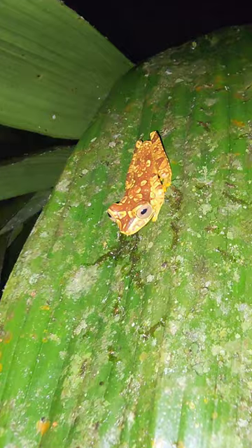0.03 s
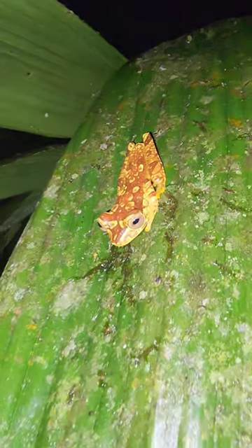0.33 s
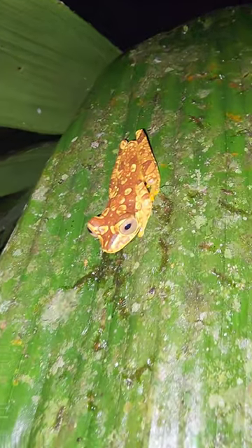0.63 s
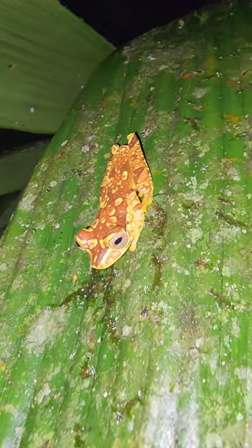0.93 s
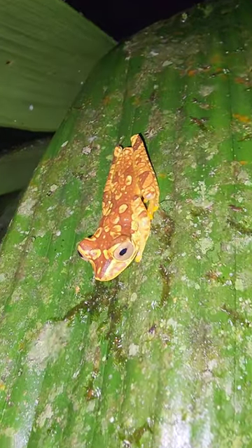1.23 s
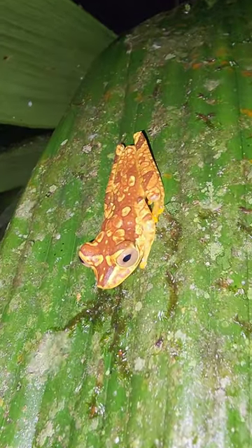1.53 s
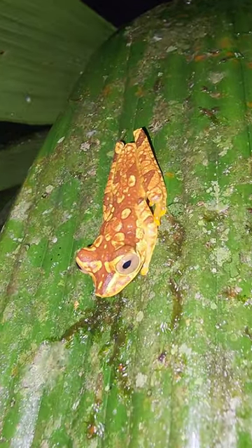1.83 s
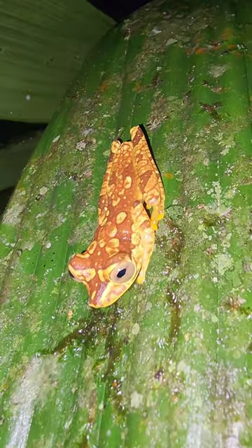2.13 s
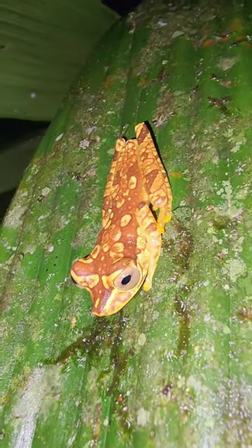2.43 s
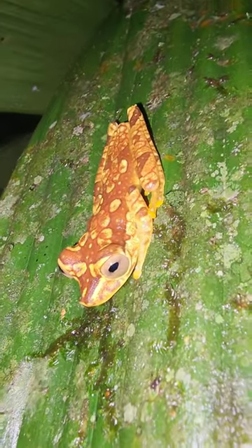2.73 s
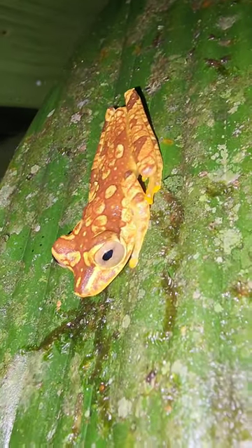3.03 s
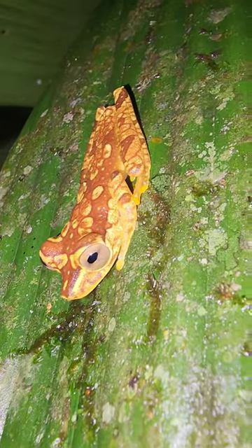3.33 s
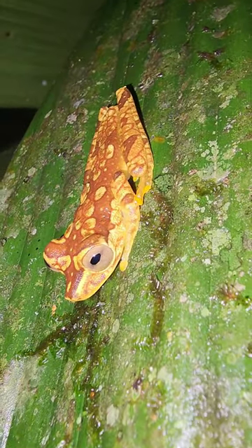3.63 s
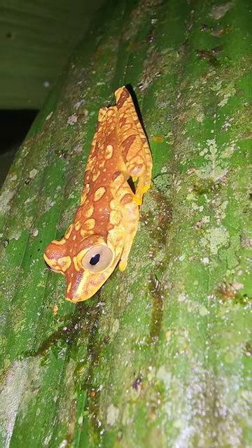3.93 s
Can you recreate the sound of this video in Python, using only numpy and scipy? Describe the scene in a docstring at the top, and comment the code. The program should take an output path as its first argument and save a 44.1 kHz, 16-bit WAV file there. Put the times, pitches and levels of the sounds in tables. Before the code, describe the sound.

Crickets trill and chirp in a dense, high chorus in a rain forest at night.

```python
"""Crickets trilling far and near in a rain forest at night, heard from a stereo microphone among the trees.
Each wing stroke is a short tone, smeared by echoes off trunks and leaves. The closest callers chirp on
the right, far whistles rise out of the chorus, and a katydid buzzes very high.
Water drips from the leaves over a soft wash of air, with a few dull bumps close to the microphone."""
import sys
import numpy as np
from scipy import signal
from scipy.fft import rfft, irfft
from scipy.io import wavfile
from scipy.ndimage import uniform_filter1d

SR = 44100
rng = np.random.default_rng(int(sys.argv[2]) if len(sys.argv) > 2 else 0)


def int16_out(signal):
    """Quantize to a 16-bit WAV file."""
    q = np.round(np.clip(np.atleast_2d(signal).T, -1, 1) * 32767)
    wavfile.write(sys.argv[1], SR, q.astype(np.int16))


N = 176400

# air all round the microphone: (frequency [Hz], relative spectral level [dB])
AIR_SPECTRUM = [(20, -38), (36, -8.5), (55, 4.5), (72, 11), (105, -9), (180, -13), (330, -4), (700, 0.5),
                (1100, -1.5), (2150, 2), (2600, -7), (3800, -4), (4230, -4), (8000, -9), (9800, -11.5),
                (11600, -9.5), (13200, -14.5), (15800, -24.5)]
# lean of the air: (frequency [Hz], left over right [dB])
AIR_BALANCE = [(60, -2), (400, 3.5), (1200, -3.0), (2700, -1.0), (9000, 0.8)]
# likeness of diffuse sound in the two channels: (frequency [Hz], correlation [-1..1])
COHERENCE = [(60, 0.82), (280, 0.98), (550, 0.45), (1000, -0.035), (2000, -0.023), (12000, 0.018)]
# close bumps: (time [s], pitch [Hz], relative level [dB])
CLOSE_BUMPS = [(0.462, 288, -64.5), (1.15, 280, -60), (1.841, 264, -60), (1.89, 324, -53.5),
               (3.235, 238, -57.5), (3.322, 346, -62), (3.35, 248, -58), (3.391, 302, -57),
               (3.456, 247, -56)]
# drops on nearby leaves: (time [s], level [dB], centre [Hz])
LEAF_DRIPS = [(.125, -49.5, 790), (.372, -43.5, 970), (.809, -45.5, 900), (.84, -47, 690),
              (1.149, -47.5, 700), (1.19, -51.5, 700), (1.566, -50, 1000), (1.675, -49, 695),
              (1.867, -45.5, 1270), (2.485, -45.5, 1480), (2.613, -46.5, 790), (2.747, -48.5, 600),
              (3.008, -53, 900), (3.243, -49, 646), (3.455, -48, 1490), (3.596, -46, 890),
              (3.907, -49, 700)]
# one crisp tick: (time [s], level [dB], 60 dB decay [s])
CRISP_TICK = (3.398, -50, 0.26)
# stray calls further off: (time [s], length [s], pitch [Hz], level [dB])
STRAY_CALLS = [(2.02, .05, 2975, -65), (2.125, .06, 2975, -62.5), (2.74, .1, 3560, -61.5),
               (3.38, .06, 3780, -65), (3.52, .04, 3560, -62)]
# one high rasp: (time [s], length [s], level [dB])
STRAY_RASP = [(2.03, 0.11, -51)]
# katydid: (time [s], length [s], pitch [Hz], relative level [dB])
KATYDID_BUZZES = [(.22, .27, 14360, -63.5), (2.065, .27, 13830, -55.5)]
# far whistles: (time [s], length [s], final pitch [Hz], relative level [dB])
RISING_WHISTLES = [(.765, .105, 5325, -48.5), (.87, .095, 5305, -50.5), (1.875, .125, 5140, -52),
                   (2.865, .135, 5333, -44)]
# low two-note calls: (time [s], level [dB])
LOW_CALLS = [(.175, -54.5), (.925, -52), (1.635, -50.5), (2.312, -53), (3.175, -56), (3.848, -54.5)]
# far cricket chorus: (frequency [Hz], relative spectral level [dB])
CHORUS_SPECTRUM = [(3000, -46), (3450, -44), (3800, -14.5), (4080, -22), (4230, -34), (4500, -19),
                   (4800, -9), (5400, -7), (5600, -5.5), (6250, -4), (6600, -6.5), (6850, -4.5), (7270, -6),
                   (7420, -13), (7750, -34), (8200, -36)]
# lean of the chorus: (frequency [Hz], left over right [dB])
CHORUS_BALANCE = [(3800, -4), (5000, -2), (5800, -4), (6500, -7), (7200, -10.5), (8000, 2)]
# distant trills: (pitch [Hz], pitch spread [Hz], level [dB], strokes [1/s], left over right [dB])
STEADY_TRILLS = [(3644, 6, -70, 15, 4), (3833, 12, -75, 31, 5), (4027, 5, -76, 40, 4),
                 (4380, 26, -68, 31, -1), (4648, 22, -61.5, 29, 0), (4904, 25, -63, 41, 0),
                 (5138, 35, -66, 38, 0), (5315, 40, -65, 45, -1), (5710, 45, -67, 49, -2),
                 (5990, 65, -61.5, 52, -4), (6400, 130, -56, 40, -7), (6637, 10, -60, 25, -5),
                 (7072, 15, -58.5, 24, -6), (7195, 50, -56, 40, -7)]
# near cricket, well to the right: (time [s], length [s], level [dB])
NEAR_CRICKET = [(.295, .05, -38), (.394, 0.021, -33), (.435, 0.013, -38), (.467, 0.024, -33),
                (.514, 0.02, -38), (1.065, 0.053, -40.5), (1.135, 0.022, -40.5), (1.50, 0.058, -44.5),
                (1.56, 0.048, -43), (1.905, 0.056, -45), (1.955, .07, -42), (2.575, 0.054, -42),
                (2.64, 0.057, -40.5)]
# loud rasping cricket, right: (time [s], length [s], level [dB])
RASPING_CRICKET = [(.09, .15, -43), (.25, 0.12, -44.5), (1.90, 0.11, -47), (2.04, 0.23, -47),
                   (3.652, 0.075, -33), (3.785, 0.023, -31.5), (3.821, 0.038, -32.5)]
# thin-voiced cricket, well to the right: (time [s], length [s], level [dB])
THIN_CRICKET = [(1.04, 0.025, -49), (1.62, .06, -53), (2.46, 0.062, -54), (2.85, 0.21, -55.5),
                (3.08, 0.122, -49.5), (3.215, 0.038, -44), (3.27, .05, -45.5), (3.375, .11, -47.5),
                (3.54, 0.043, -47.5)]
# evenly paced cricket, right of centre: (time [s], length [s], level [dB])
EVEN_CRICKET = [(.16, 0.039, -43.5), (.565, .06, -45), (.96, 0.054, -49), (1.345, 0.052, -49),
                (1.70, .06, -53.5), (2.26, 0.054, -50), (2.68, 0.037, -54), (3.09, 0.045, -49.5),
                (3.39, 0.047, -47), (3.63, 0.031, -45), (3.79, .06, -49)]
# far rasping cricket, just left of centre: (time [s], length [s], level [dB])
FAR_CRICKET = [(.345, .17, -52), (.78, .16, -55), (1.49, 0.14, -55), (1.885, 0.13, -54),
               (2.93, 0.124, -50.5), (3.62, 0.2, -55)]


def amp(db):
    """Decibels to gain."""
    return 10 ** (np.asarray(db) / 20)


def unit(x):
    """Scales to rms 1."""
    return x / np.sqrt(np.mean(x ** 2) + 1e-20)


def read(points, hz):
    """Reads a table on a log-frequency axis."""
    f, value = np.transpose(points)
    return np.interp(np.log(hz + 1), np.log(f), value)


def add(mix, s, sound):
    """Mixes a sound in at s seconds."""
    part = mix[..., max(0, round(s * SR)):][..., :sound.shape[-1]]
    part += sound[..., :part.shape[-1]]


def drift(n, rate_hz):
    """Smooth random wander of rms about 1."""
    f = np.fft.rfftfreq(32768, 10 / SR)
    slow = unit(irfft(rfft(rng.standard_normal(32768)) * np.exp(-(f / rate_hz) ** 2)))
    return np.interp(np.arange(n) / 10, np.arange(len(slow)), slow)


def puff(hz, octaves, t60):
    """A dying burst of noise round one pitch, in two channels."""
    t, f = np.arange(SR // 4) / SR, np.fft.rfftfreq(SR // 4, 1 / SR) + 1
    band = np.exp(-.5 * (np.log2(f / hz) / octaves) ** 2)
    noise = irfft(rfft(rng.standard_normal((2, len(t)))) * band, len(t))
    return unit(noise) * np.minimum(t / 0.0016, 1) * amp(-60 * t / t60)


def forest(x, wet, side_db, t60=0.62):
    """Direct sound plus scattered echoes from trunks and leaves; positive side_db is to the left."""
    t = np.arange(SR * 3 // 4) / SR
    taps = rng.standard_normal((2, len(t))) * (rng.random((2, len(t))) < .08) * amp(-60 * t / t60)
    taps *= np.sqrt(wet) / np.linalg.norm(taps, axis=1, keepdims=True)
    taps[[0, 1], rng.integers(0, 8, size=2)] += np.sqrt(1 - wet)  # direct path
    out = signal.oaconvolve(x[None], taps, axes=1)[:, :N]
    pan = unit(amp(np.array([[side_db], [-side_db]]) / 2))
    return out * x.std() / (out.std(axis=1, keepdims=True) + 1e-12) * pan


def wash(spectrum, balance, flicker_db, patch_db):
    """Diffuse noise from all sides, whose level flickers and drifts in patches."""
    frames, hz = N // 256 + 5, np.fft.rfftfreq(1024, 1 / SR)
    a, b, c, d, patches = rng.standard_normal((frames, len(hz), 5)).T
    patches = unit(uniform_filter1d(uniform_filter1d(patches, size=14, axis=0), size=16, axis=1))
    flicker = unit(uniform_filter1d(rng.standard_normal(frames), size=3))
    likeness, lean = read(COHERENCE, hz)[:, None], amp(read(balance, hz) / 2)[:, None]
    left = a + 1j * b
    right = likeness * left + np.sqrt(1 - likeness ** 2) * (c + 1j * d)
    bins = np.array([left * lean, right / lean])
    bins *= amp(read(spectrum, hz)[:, None] + patch_db * patches + flicker_db * flicker)
    return unit(signal.istft(bins, nperseg=1024, noverlap=768)[1][:, :N])


def strokes(n, hz, spread_hz, per_s, duty=.7, jitter=.12):
    """Wing strokes: each is a short tone that sags in pitch and fills the duty share of its cycle."""
    cycle = np.cumsum(per_s * (1 + jitter * drift(n, 8.3))) / SR % 1
    progress = np.minimum(cycle / duty, 1)
    pitch = hz + spread_hz * (2 * (.5 - progress) + 0.765 * drift(n, 232))
    return unit(np.sin(np.pi * progress) * np.sin(2 * np.pi * np.cumsum(pitch) / SR))


def chirps(rows, hz, spread_hz, per_s, edge_s=0.0072):
    """Short bursts of back-to-back wing strokes from one caller."""
    out = np.zeros(N)
    for s, length, db in rows:
        t = np.arange(0, length, 1 / SR)
        fade = np.clip(np.minimum(t, length - t) / edge_s, 0, 1)
        add(out, s, amp(db) * fade * strokes(len(t), hz, spread_hz, per_s, duty=1.0))
    return out


def air():
    """The bed of the place: a soft hiss over a low rumble."""
    return amp(-54) * wash(AIR_SPECTRUM, AIR_BALANCE, flicker_db=0.6, patch_db=1.5)


def bumps(gain_db=5):
    """Soft low knocks near the microphone, almost alike in both channels."""
    out = np.zeros((2, N))
    for s, hz, db in CLOSE_BUMPS:
        mid, side = amp(db + gain_db) * puff(hz, octaves=.4, t60=.1)
        add(out, s, np.array([mid + 0.18 * side, mid - 0.28 * side]))
    return out


def drips(patter_per_s=110, patter_db=-61.5, size_db=3.5):
    """Drops land on leaves: a few clear ones, a patter of far ones, and one crisp tick."""
    near, far = np.zeros((2, N)), np.zeros((2, N))
    for s, db, hz in LEAF_DRIPS:
        add(near, s, amp(db) * puff(hz, octaves=1, t60=.1))
    pitches = np.geomspace(500, 1800, num=8)
    for hz in pitches:
        lands = rng.random(N) < patter_per_s / len(pitches) / SR
        hits = lands * amp(size_db * np.minimum(rng.exponential(1, N), 2.5))
        far += signal.oaconvolve(hits[None], puff(hz, octaves=0.8, t60=.07), axes=1)[:, :N]
    s, db, t60 = CRISP_TICK
    add(near, s, amp(db) * puff(12700, octaves=0.48, t60=t60))
    return near + amp(patter_db) * unit(far)


def strays():
    """Single pips and one high rasp from further off among the trees."""
    pips = sum(chirps([(s, length, db)], hz, spread_hz=25, per_s=54)
               for s, length, hz, db in STRAY_CALLS)
    pips = forest(pips, wet=0.82, side_db=2, t60=0.39)
    rasp = chirps(STRAY_RASP, hz=7740, spread_hz=210, per_s=140)
    return pips + forest(rasp, wet=.75, side_db=-3, t60=0.75)


def katydid(rise_hz=600, gain_db=0.5):
    """Fast wing strokes near the centre: a very high buzz that swells, climbs a little and fades."""
    out = np.zeros(N)
    for s, length, hz, db in KATYDID_BUZZES:
        progress = np.arange(0, length, 1 / SR) / length
        buzz = strokes(len(progress), hz + rise_hz * (progress - .5), spread_hz=230, per_s=170)
        add(out, s, amp(db + gain_db) * np.sin(np.pi * progress) * buzz)
    return forest(out, wet=0.56, side_db=0.3, t60=0.65)


def whistles(rise=.13, swell_db=13.5, gain_db=4.5):
    """Far whistles that swell as they slide up, reaching the microphone mostly as echo."""
    out = np.zeros(N)
    for s, length, hz, db in RISING_WHISTLES:
        progress = np.arange(0, length, 1 / SR) / length
        slide = np.maximum(1 - progress / .6, 0) ** 1.3  # 1 at the start, 0 at the final pitch
        waver = (.003 + .03 * slide) * drift(len(progress), 250)
        pitch = hz * (1 - rise * slide + waver)
        tone = np.sqrt(2) * np.sin(2 * np.pi * np.cumsum(pitch) / SR)
        fade = np.clip(np.minimum(progress, 1 - progress) / 0.073, 0, 1)
        add(out, s, amp(db + gain_db - swell_db * slide) * fade * tone)
    return forest(out, wet=0.99, side_db=0, t60=.85)


def low_chirps(note_s=0.0563, spacing_s=0.066):
    """A distant two-note call, repeated about every three quarters of a second."""
    notes = [(s + k * spacing_s, note_s, db) for s, db in LOW_CALLS for k in range(2)]
    calls = chirps(notes, hz=3550, spread_hz=56, per_s=88.3, edge_s=0.013)
    return forest(calls, wet=.88, side_db=1, t60=0.53)


def chorus():
    """Crickets so many and so far off that they merge into a band of noise."""
    return amp(-48) * wash(CHORUS_SPECTRUM, CHORUS_BALANCE, flicker_db=1.6, patch_db=1.0)


def trills(swell_db=2.3):
    """Distant crickets whose wings never stop, each wandering in level."""
    out = np.zeros((2, N))
    for hz, spread_hz, db, per_s, side_db in STEADY_TRILLS:
        trill = amp(db + swell_db * drift(N, 3.6)) * strokes(N, hz, spread_hz, per_s)
        out += forest(trill, wet=0.63, side_db=side_db)
    return out


def crickets():
    """Five callers, each with its own pitch, stroke rate and place round the microphone."""
    near = chirps(NEAR_CRICKET, hz=7180, spread_hz=65, per_s=72, edge_s=0.0087)
    out = forest(near, wet=0.72, side_db=-12.5, t60=0.28)
    rasping = chirps(RASPING_CRICKET, hz=6520, spread_hz=172, per_s=125)
    out += forest(rasping, wet=0.65, side_db=-9, t60=0.56)
    thin = chirps(THIN_CRICKET, hz=6510, spread_hz=42, per_s=41)
    out += forest(thin, wet=0.32, side_db=-13)
    even = chirps(EVEN_CRICKET, hz=6025, spread_hz=41, per_s=34)
    out += forest(even, wet=0.66, side_db=-6, t60=0.4)
    far = chirps(FAR_CRICKET, hz=4920, spread_hz=195, per_s=110)
    return out + forest(far, wet=0.83, side_db=2, t60=0.57)


def scene():
    """The chorus, its single callers and the damp forest, as they meet at the microphone."""
    return (chorus() + air() + trills() + crickets() + low_chirps()
            + whistles() + katydid() + strays() + drips() + bumps())


def record(dry):
    """The microphone is switched on after a moment, and the highest treble is cut off."""
    start_s, cutoff_hz = .078, 15800
    switch = np.clip((np.arange(N) / SR - start_s) / 0.0018, 0, 1)
    lowpass = signal.firwin(511, cutoff_hz, window=("kaiser", 9), fs=SR)
    return signal.oaconvolve(dry * switch, lowpass[None], "same")


dry = scene()
out = record(dry)
int16_out(out)
```